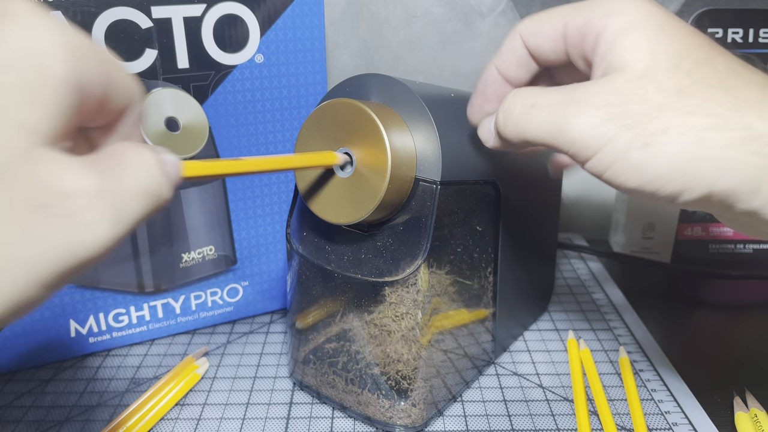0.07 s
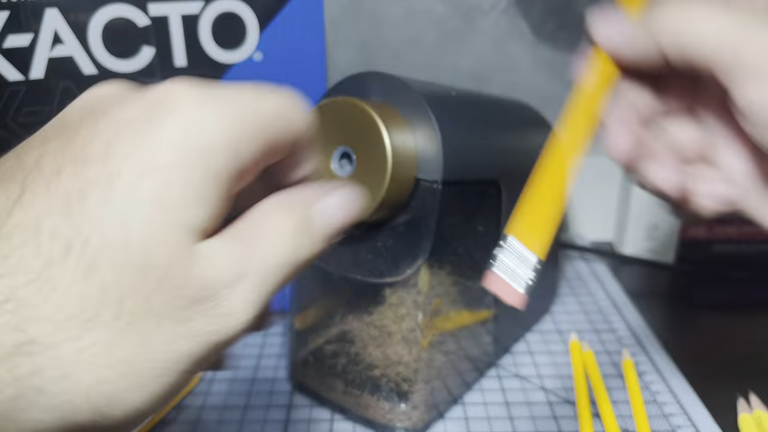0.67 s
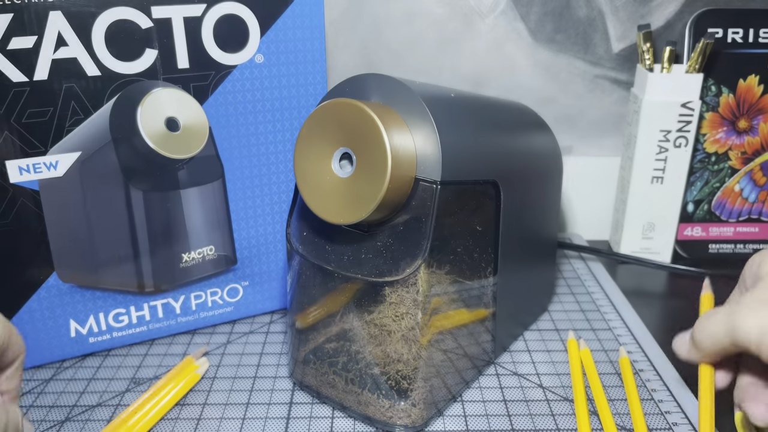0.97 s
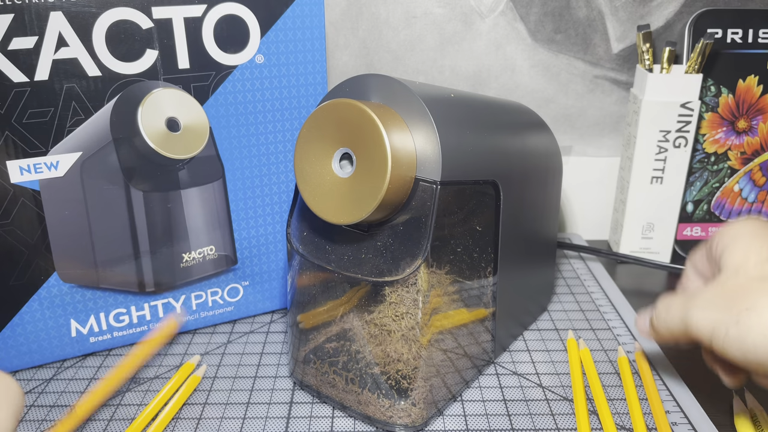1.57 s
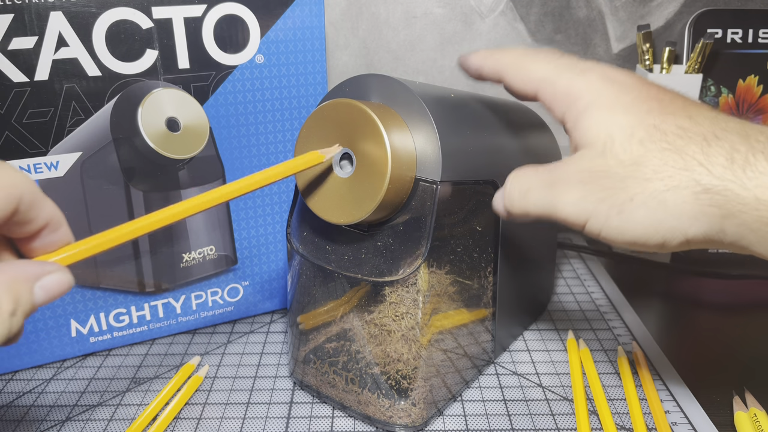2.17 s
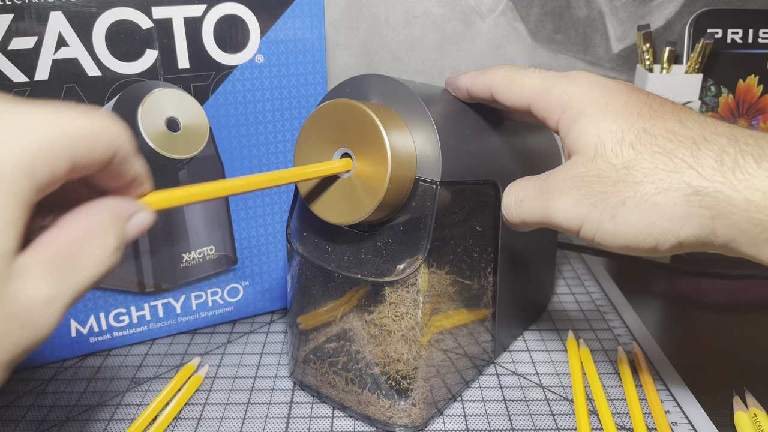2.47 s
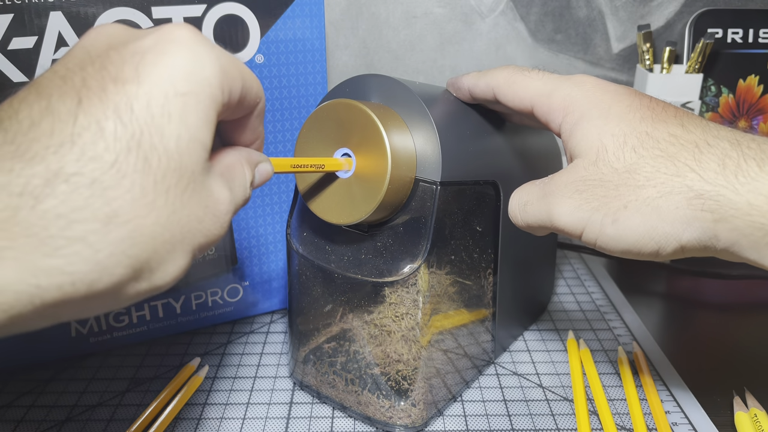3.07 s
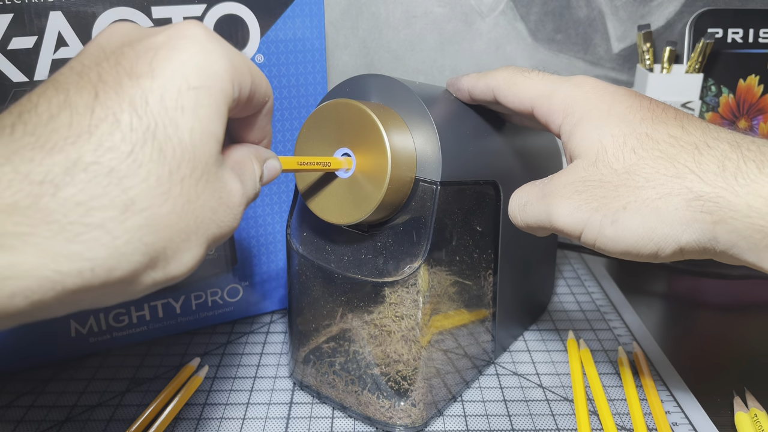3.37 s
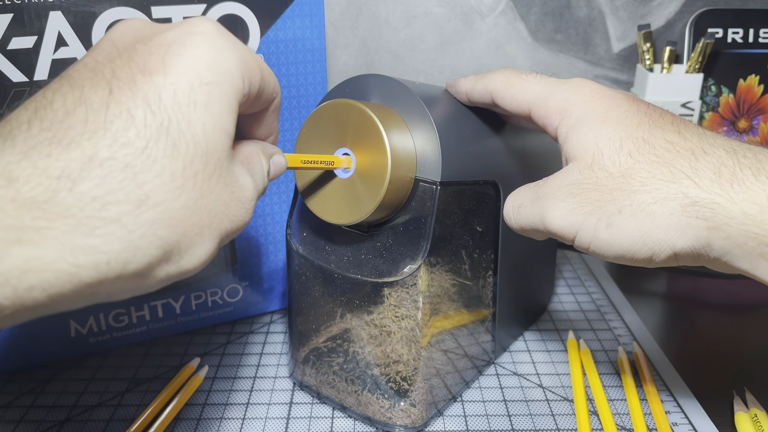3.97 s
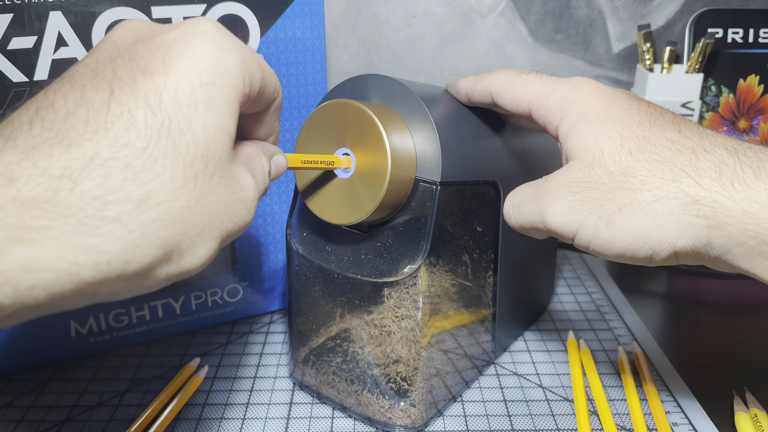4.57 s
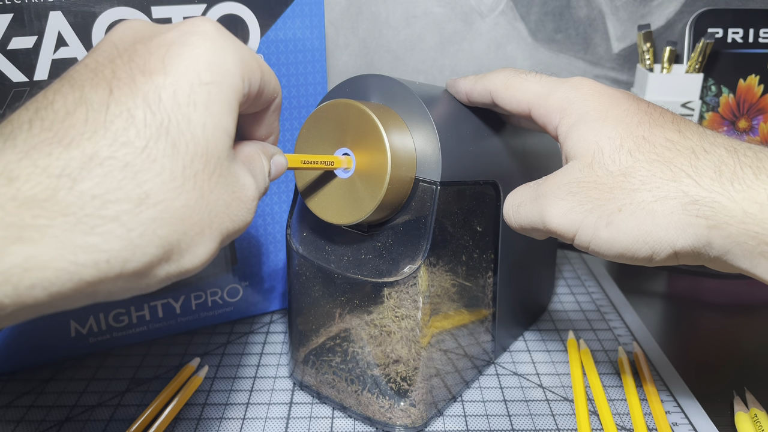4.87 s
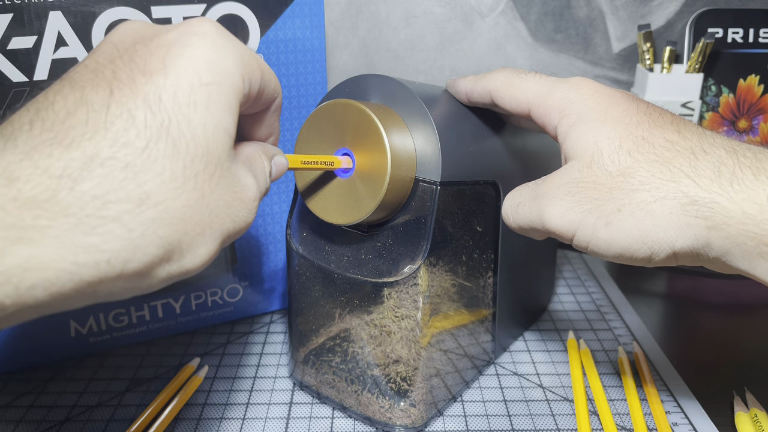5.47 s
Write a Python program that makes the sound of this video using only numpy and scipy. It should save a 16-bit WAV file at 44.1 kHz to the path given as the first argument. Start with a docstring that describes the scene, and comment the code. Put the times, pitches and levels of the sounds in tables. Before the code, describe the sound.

Pencils clatter lightly on a desk, then an electric sharpener grinds loudly through wood, eases to a lighter ticking whir and winds down.

```python
"""Electric pencil sharpener on a desk

Close up, small room. A pencil is drawn out and dropped among others; the next is fed in and starts
the motor. Hand push sets how hard the gears rattle in the plastic case and how deep the cutter rasps.
As it eases, the cutter runs lightly, catching the point once a turn, then switches off and coasts
to rest. A last scrape and two taps on the rim of the hole follow."""
import sys
import numpy as np
from scipy import signal
from scipy.fft import rfft, irfft, next_fast_len
from scipy.io import wavfile
from scipy.ndimage import uniform_filter1d

SR = 44100
rng = np.random.default_rng(int(sys.argv[2]) if len(sys.argv) > 2 else 0)


def store_pcm(level_fs):
    """Save levels as 16-bit WAV."""
    pcm = np.round(np.clip(level_fs, -1, 1) * 32767).astype(np.int16)
    wavfile.write(sys.argv[1], SR, np.atleast_2d(pcm).T)


N = 252252
TIME_S = np.arange(N) / SR
ON_S, OFF_S, FREE_TURNS_PER_S = 2.596, 4.926, 6.87

# Plastic case, cutter loose. Each row: frequency in Hz, width in Hz, lift in dB.
CASE_MODES = [(457, 130, 7.5), (766.3, 58, 13.5), (858, 120, 9), (1154, 90, 3.5), (1512, 210, 4.5),
              (1893, 70, 6.5), (2158, 65, 12), (2415, 46, 5.5), (3504, 270, 5), (3700, 220, 1.5),
              (4510, 170, 11)]
# Gear noise. Each row: frequency in Hz, density in dB.
GEAR_SPECTRUM = [(30, -37), (70, -16), (170, -21), (270, -9), (600, -5), (1000, -5), (1350, -10),
                 (2200, -12), (2650, -20.5), (4500, -27), (6500, -28.5), (9000, -45), (13000, -44)]
# Chips ticking in the bin. Each row: frequency in Hz, density in dB.
CHIP_SPECTRUM = [(200, -33.5), (1500, -6.5), (3300, 4.5), (4600, -4.5), (6200, -5.5), (8400, 0.5),
                 (10300, 0.5), (11600, -5), (12900, -18.5), (13500, -22.5), (16000, -37.5)]


def sharpener(sag=.23, wedging=.82, throb_db=1.0):
    """Gear rattle plus cutter rasp; both grow with load and fade as the motor slows."""
    push, depth, spin = drive()
    turns_per_s = FREE_TURNS_PER_S * spin * (1 - sag * push ** 2)
    angle = 2 * np.pi * np.cumsum(turns_per_s) / SR
    bite = np.clip(wedging * depth, 0, 1)
    pace = np.clip(spin / .8, 0, 1)
    # Load swings 3 times a turn in wood, 4 when loose.
    throb = amp(throb_db * (bite * np.sin(3 * angle) + (.5 - bite) * np.sin(4 * angle)))
    knocks = tooth_knocks(angle) * throb
    rattle = gears(knocks, bite, pace)
    cutting = cutter(knocks, bite, pace, throb, turns_per_s)
    spin_decades = np.log10(spin + 1e-9)
    rattle_db = -28 + 12 * push + 32.5 * spin_decades
    cutting_db = -45 + 19 * depth + 47 * spin_decades
    return amp(rattle_db) * rattle + amp(cutting_db) * cutting


def drive(seated_s=2.88, seating_s=.26, full_depth_push=.76, spin_up_s=.03, coast_s=.55):
    """Hand push, blade depth and motor spin, each 0-1; depth grows as the tip seats."""
    # Each row: time in seconds, push 0-1.
    hand_push = [(2.6, 0.56), (2.83, .86), (3.3, 0.98), (3.5, 0.67), (3.575, 0.7), (3.635, 0.05),
                 (3.9, 0.02), (4.45, .2), (4.62, .14), (4.89, .33), (4.95, 0)]
    push = np.clip(np.interp(TIME_S, *np.transpose(hand_push)), 0, 1)
    seated = np.clip(1 + (TIME_S - seated_s) / seating_s, 0, 1)
    spin_up = 1 - np.exp(-np.maximum(TIME_S - ON_S, 0) / spin_up_s)
    coast = 1 - np.clip((TIME_S - OFF_S) / coast_s, 0, 1) ** 1.25
    return push, seated * np.minimum(push / full_depth_push, 1), spin_up * coast


def tooth_knocks(angle, teeth=58):
    """One impulse per gear tooth, uneven in time and strength."""
    tooth = np.maximum.accumulate(np.floor(teeth * angle / (2 * np.pi) + .25 * wander(400)))
    return (np.diff(tooth, prepend=tooth[0]) > 0) * strengths(spread_db=5)


def gears(knocks, bite, pace):
    """Teeth ring the case: clattering when fast, smooth and dull when slow."""
    # Case, pencil wedged against the cutter. Each row: frequency in Hz, width in Hz, lift in dB.
    wedged_modes = [(266, 180, 3.5), (407.5, 45, 10.5), (744, 50, 8.5), (812, 99, 13.5), (968, 38, 7.5),
                    (1164, 60, 11.5), (1395, 70, 9.5), (1690, 53, 4.5), (1856, 43, 11), (2190, 70, 11.5),
                    (2450, 60, 5.5), (3380, 370, 11.5), (4170, 440, 4.5)]
    mesh = noise() * (pace * bursts(knocks, decay_s=.00098) + 2.3 - pace)
    mesh = pace * mesh + (1 - pace) * 2.4 * lowpass(mesh, 800, order=1)
    loose = unit_running(colour(mesh, GEAR_SPECTRUM, CASE_MODES))
    wedged = unit_running(colour(mesh, GEAR_SPECTRUM, wedged_modes))
    return amp(1) * (1 - bite) * loose + amp(.5) * bite * wedged


def cutter(knocks, bite, pace, throb, turns_per_s, chips_per_turn=16):
    """Blades rasp steadily in a deep bite; a light one gives chip ticks and splinter snaps."""
    # Each row: frequency in Hz, density in dB.
    rasp_spectrum = [(200, -28.5), (1500, 5), (3000, -15.5), (4500, 2), (6200, -8), (8300, 5), (10300, 6.5),
                     (11600, 1.5), (12900, -1.5), (13500, -8.5), (14500, -13), (16000, -19)]
    rasp = unit_running(colour(noise() * np.sqrt(throb) * amp(2 * wander(130)), rasp_spectrum))
    chips = (rng.random(N) < chips_per_turn * turns_per_s / SR) * strengths(spread_db=6) * throb
    ticking = pace * bursts(chips + .5 * knocks, decay_s=.0018) + 1.4 - pace
    ticks = unit_running(colour(noise() * ticking, CHIP_SPECTRUM, CASE_MODES[-3:]))
    snaps = unit_running(splinters(rate_per_s=60 * turns_per_s * pace * throb))
    return amp(2.5) * bite * rasp + amp(3.5) * (1 - bite) * ticks + (1 - .94 * bite) * snaps


def splinters(rate_per_s, pitches=24, size=300):
    """Splinters snap, each a cycle or two at its own pitch."""
    snaps = (rng.random(N) < rate_per_s / SR) * strengths(spread_db=10)
    pitch_index = rng.integers(0, pitches, N)
    out, t = np.zeros((2, N)), np.arange(size) / SR
    for k, hz in enumerate(np.geomspace(2600, 4700, pitches)):
        cycles = hz * t
        snap = np.sin(2 * np.pi * cycles + rng.normal(0, .97, (2, 1))) * cycles * np.exp(-cycles)
        out += signal.oaconvolve((snaps * (pitch_index == k))[None], snap, axes=1)[:, :N]
    return unit(out)


def snags(jolt_trim_db=-1.5, size=4096):
    """A caught splinter jolts the gears and tears off with a crunch."""
    # Each row: start in seconds, relative jolt in dB, crunch in dB, tearing time in seconds.
    hard_snags = [(2.608, -15, -35.5, 0.0032), (2.657, -11.5, -27, 0.0071), (2.691, -7.5, -36, 0.0053),
                  (2.703, -13, -21.5, 0.0068), (2.768, -12.5, -25, 0.023), (2.823, -4, -17.5, .0055),
                  (3.962, -10, -35, 0.0049), (4.105, -23, -45, .004), (4.278, -12, -28.5, .005),
                  (4.538, -11, -55, 0.0058), (4.69, -20, -33.5, .004), (4.823, -11.5, -26.5, 0.0054),
                  (5.08, -13.5, -57, .004), (5.219, -19, -36.5, .005)]
    out, t = np.zeros((2, N)), np.arange(size) / SR
    for start_s, jolt_db, crunch_db, tear_s in hard_snags + light_snags():
        tear = (1 - np.exp(-t / .0006)) * np.exp(-(t / (2 * tear_s)) ** 2)
        jolt = colour(noise(size) * tear, GEAR_SPECTRUM, CASE_MODES)
        jolt *= amp(jolt_db + jolt_trim_db) / abs(jolt).max()
        crunch = colour(noise(size) * tear, CHIP_SPECTRUM, CASE_MODES[-3:])
        crunch *= amp(crunch_db) / crunch[:, :size // 10].std()
        add(out, start_s + .001, jolt + crunch)
    return out


def light_snags(first_s=3.714, chance_per_s=11, spread_db=1.0, count=40):
    """Snag rows under light push: one catch a turn, plus small ones by chance."""
    # Each: relative jolt in dB, crunch in dB, tearing time in seconds.
    turn_catch = (-21, -31.5, 0.0041)
    small_snag = (-30, -38.5, 0.0037)
    chance_s = first_s + np.cumsum(rng.uniform(.3, 1.7, count)) / chance_per_s
    rows = [(first_s + k / FREE_TURNS_PER_S, *turn_catch) for k in range(count)]
    rows += [(s, *small_snag) for s in chance_s]
    offsets_db = spread_db * rng.standard_normal(len(rows))
    return [(s, jolt_db + db, crunch_db + db, tear_s)
            for (s, jolt_db, crunch_db, tear_s), db in zip(rows, offsets_db) if s < OFF_S]


def pencil_drop():
    """A pencil bounces among the others and rocks to rest."""
    # Each row: start in seconds, relative body and click levels in dB.
    clacks = [(1.256, -23.5, -39), (1.267, -23, -14.5), (1.294, -24, -35.5), (1.319, -21, -29.5),
              (1.332, -30, -29), (1.345, -29, -19.5), (1.493, -30.5, -39), (1.516, -37, -56),
              (1.53, -36, -34.5), (1.706, -41.5, -77)]
    # Each row: frequency in Hz, width in Hz, lift in dB.
    pencil_modes = [(270, 110, 4.5), (420, 100, 4), (710, 83, 3), (1635, 230, 4.5), (1870, 280, 14),
                    (3000, 240, 3), (4575, 300, 12.5)]
    return blows(clacks + rocking(), pencil_modes, body_gain_db=12.5, click_gain_db=18.5,
                 click_s=.0026, chatter_s=.012, soft_hz=11000, detune=.029)


def rocking(gap_s=.028, loss_db=5):
    """Blow rows of a pencil settling on its flats: evenly spaced, each weaker."""
    # Each row: start and end in seconds, first knock's relative body and click levels in dB.
    spells = [(1.356, 1.46, -25, -60.5), (1.565, 1.61, -27, -52)]
    return [(s, body_db - k * loss_db, click_db - k * loss_db)
            for start_s, end_s, body_db, click_db in spells
            for k, s in enumerate(np.arange(start_s, end_s, gap_s))]


def desk_bumps():
    """A pencil end meets the desk mat."""
    # Each row: start in seconds, relative body and click levels in dB.
    bumps = [(1.067, -45, -66), (1.089, -44.5, -83.5), (1.178, -27, -39), (1.186, -28.5, -51),
             (1.196, -31, -52)]
    # Each row: frequency in Hz, width in Hz, lift in dB.
    desk_modes = [(270, 80, 5), (500, 58, 9.5), (861, 63, 12), (1040, 90, 9.3), (1230, 50, 18),
                  (1424, 70, 6), (2030, 90, 5)]
    return blows(bumps, desk_modes, body_gain_db=16.5, click_gain_db=19,
                 click_s=.0022, chatter_s=.0061, soft_hz=7000, detune=.02)


def rim_taps():
    """The pencil touches the rim of the guide hole."""
    # Each row: start in seconds, relative body and click levels in dB.
    taps = [(0.003, -47, -37), (0.04, -54, -41), (0.062, -28.5, -36), (0.101, -37, -43.5),
            (2.249, -26.5, -45), (2.26, -25, -49), (2.402, -30, -56), (2.452, -40.5, -44.5),
            (2.51, -41, -46.5), (2.585, -25, -36), (5.6, -36, -62.5), (5.711, -32, -28)]
    # Each row: frequency in Hz, width in Hz, lift in dB.
    rim_modes = [(470, 70, 13), (555, 87, 17.5), (770, 120, 7), (1217, 80, 4), (1900, 120, 4),
                 (2270, 110, 11)]
    return blows(taps, rim_modes, body_gain_db=13.5, click_gain_db=21.5,
                 click_s=.0018, chatter_s=.007, soft_hz=7500, detune=.02)


def blows(rows, modes, body_gain_db, click_gain_db, click_s, chatter_s, soft_hz, detune, size=8192):
    """Each blow rings the struck body and clicks at the contact."""
    # Each row: frequency in Hz, density in dB.
    wood_spectrum = [(30, -23.5), (100, -10), (250, -2), (500, -1), (1000, 0.5), (2100, -7), (3000, -10.5),
                     (5000, -16), (12000, -38.5)]
    click_spectrum = [(300, -33), (1800, 5), (3000, -5.5), (4500, -1), (6500, -6), (8300, -3), (11000, 4),
                      (12200, -18.5), (13300, -27.5), (16000, -40)]
    out, t = np.zeros((2, N)), np.arange(size) / SR
    click_envelope = (1 - np.exp(-t / .0003)) * (np.exp(-t / click_s) + .07 * np.exp(-t / .017))
    for start_s, body_db, click_db in rows:
        chatter = noise(size) * (1 - np.exp(-t / .00093)) * np.exp(-t / chatter_s)
        contact = .25 * (t == 0) + chatter / np.linalg.norm(chatter[0])
        # Modes shift with the contact point and the way the pencil lies.
        ratios = 1 + detune * (2 * rng.random(len(modes)) - 1)
        shifted = [(hz * ratio, width_hz, db) for (hz, width_hz, db), ratio in zip(modes, ratios)]
        # Little click means a soft blow: high modes stay still.
        top_hz = np.clip(soft_hz * amp((click_db - body_db) / 2), 600, 12000)
        body = lowpass(colour(contact, wood_spectrum, shifted), top_hz, order=2)
        body *= amp(body_db + body_gain_db) / np.linalg.norm(body[0])
        click = colour(noise(size) * click_envelope, click_spectrum)
        click *= amp(click_db + click_gain_db) / np.linalg.norm(click[0])
        add(out, start_s + .0014, body + click)
    return out


def sliding():
    """Wood scrapes in the guide hole and rings it; fingers slip once over the lacquer."""
    # Each row: start and length in seconds, first and last level in dB.
    slides = [(-.01, .09, -41, -42.5), (2.274, .182, -60, -46), (2.502, .1, -50, -46.5),
              (5.673, .05, -57.5, -37)]
    finger_slip = (.35, .09, -64.5, -69)
    # Each row: frequency in Hz, density in dB.
    rub_spectrum = [(40, -29.5), (200, -18.5), (380, -3), (560, -5), (800, -4.5), (2200, -11.5),
                    (2900, -17.5), (4000, -16.5), (6500, -29), (8700, -12.5), (11000, -22.5), (12300, -46),
                    (14000, -52.5)]
    skin_spectrum = [(500, -36), (5000, -22), (6500, -8), (7400, 2), (9300, 2), (11500, -7), (13000, -32)]
    # Each row: frequency in Hz, width in Hz, lift in dB.
    hole_modes = [(523, 100, 8.5), (2200, 200, 3.5), (3850, 300, 4.5)]
    scrape = unit(colour(noise() * amp(2.5 * wander(200)), rub_spectrum, hole_modes))
    hiss = unit(colour(noise(), skin_spectrum))
    return sum(stroke(*row) for row in slides) * scrape + stroke(*finger_slip) * hiss


def stroke(start_s, length_s, first_db, last_db, attack_s=.008, release_s=.013):
    """Slide envelope: attack, even swell or fade, release."""
    t = TIME_S - start_s
    gate = np.clip(t / attack_s, 0, 1) * np.exp(-np.maximum(t - length_s, 0) / release_s)
    return gate * amp(first_db + (last_db - first_db) * np.clip(t / length_s, 0, 1))


def motor_hum(mains_hz=60, rise_s=.08, fade_s=.0426):
    """The iron pulls twice per mains cycle, harder and less evenly under load."""
    # Each row: multiple of the mains, relative level in dB.
    orders = [(1, -15), (2, 0), (4, -16.5)]
    push = drive()[0]
    tone = unit(sum(amp(db) * np.sin(2 * np.pi * (k * mains_hz * TIME_S + rng.random()))
                    for k, db in orders))
    rise = np.clip((TIME_S - ON_S) / rise_s, 0, 1) ** 2
    fade = np.exp(-np.maximum(TIME_S - OFF_S, 0) / fade_s)
    level_db = -42 + 1.5 * push + 1.5 * (.5 + push) * wander(1500)
    return amp(level_db) * rise * fade * tone


def room_echoes(x, size=20000):
    """Sparse wall echoes, each band at its own decay rate; soft clutter dulls the treble."""
    # Each row: frequency in Hz, 60 dB decay time in seconds.
    decay_times = [(150, .34), (660, .26), (1800, .27), (4600, .22), (12000, .15)]
    taps = rng.standard_normal((2, size)) * (rng.random((2, size)) < .1) * (np.arange(size) > .004 * SR)
    hz, t, bands = signal.stft(taps, SR, nperseg=256)
    tilt_db = lookup([(200, 6.0), (2000, -2.0), (7000, -1.5), (10500, -6.5)], hz)[:, None]
    decay_db = 60 * t / lookup(decay_times, hz)[:, None]
    tail = signal.istft(bands * amp(tilt_db - decay_db), SR, nperseg=256)[1]
    return signal.fftconvolve(x, tail / np.linalg.norm(tail[0]), axes=1)[:, :N]


def room_noise(level_db=-66.5):
    """Faint steady rumble and hiss."""
    # Each row: frequency in Hz, density in dB.
    spectrum = [(12, -35), (20, -16), (32, -14), (54, -2.5), (108, -15.5), (229, -21.5), (367, -28.5),
                (421, -30.5), (540, -34.5), (1140, -40.5), (1240, -42), (6360, -51), (15000, -59)]
    return amp(level_db) * unit(colour(noise(), spectrum))


def noise(size=N):
    """White noise, partly coherent at the two microphone ports."""
    # Each row: frequency in Hz, coherence 0-1.
    port_coherence = [(100, 1), (500, .94), (850, 0.85), (1250, 0.45), (2000, 0.78), (4000, .7),
                      (7000, 0.71), (8500, .92), (10300, 1), (13000, 0.97)]
    a, b = rfft(rng.standard_normal((2, size)))
    coherence = np.clip(lookup(port_coherence, np.fft.rfftfreq(size, 1 / SR)), 0, 1)
    mid, side = np.sqrt((1 + coherence) / 2) * a, np.sqrt((1 - coherence) / 2) * b
    return irfft(np.array([mid + side, mid - side]), size)


def colour(x, spectrum, modes=(), size=4096):
    """Minimum-phase filter: broad spectrum plus ringing modes."""
    hz = np.fft.rfftfreq(size, 1 / SR)
    lift = 1 + sum((amp(db) ** 2 - 1) / (1 + (2 * (hz - mode_hz) / width_hz) ** 2) ** 2
                   for mode_hz, width_hz, db in modes)
    cepstrum = irfft(np.log(amp(lookup(spectrum, hz)) * np.sqrt(np.abs(lift))))
    cepstrum[1:size // 2] *= 2
    cepstrum[size // 2 + 1:] = 0
    response = irfft(np.exp(rfft(cepstrum)))
    return signal.oaconvolve(x, response[None], axes=1)[:, :x.shape[1]]


def lowpass(x, hz, order):
    """Maximally flat low-pass."""
    return signal.sosfilt(signal.butter(order, hz, fs=SR, output="sos"), x)


def bursts(impacts, decay_s):
    """Envelope of one dying burst per impact, levelled over the long run."""
    power = signal.lfilter([1], [1, -np.exp(-1 / (decay_s * SR))], impacts ** 2)
    return np.sqrt(power / (np.abs(uniform_filter1d(power, size=5000)) + 1e-9))


def strengths(spread_db):
    """Random impact gains."""
    return amp(spread_db * np.clip(rng.standard_normal(N), -2, 2))


def wander(samples):
    """Smooth random drift, rms 1."""
    return unit(uniform_filter1d(uniform_filter1d(rng.standard_normal(N), samples), samples))


def amp(db):
    """Decibels to gain."""
    return 10 ** (np.asarray(db) / 20)


def unit(x):
    """Scale to rms 1."""
    return x / np.sqrt(np.mean(x ** 2) + 1e-20)


def unit_running(x):
    """Scale to rms 1 over the motor's on time."""
    return x / np.sqrt(np.mean(x[:, (TIME_S > ON_S) & (TIME_S < OFF_S)] ** 2) + 1e-20)


def lookup(table, hz):
    """Interpolate on a log-frequency axis."""
    table_hz, values = np.transpose(table)
    return np.interp(np.log(hz + 1), np.log(table_hz + 1), values)


def add(mix, start_s, sound):
    """Mix in a stereo sound."""
    part = mix[:, max(round(start_s * SR), 0):][:, :sound.shape[1]]
    part += sound[:, :part.shape[1]]


def scene():
    """Sharpener, handled pencils, quiet room."""
    machine = sharpener() + snags()
    handling = sliding() + pencil_drop() + desk_bumps() + rim_taps()
    echoes = room_echoes(amp(-19.5) * machine + amp(-12) * handling)
    return machine + handling + echoes + motor_hum() + room_noise()


def record(dry, ceiling=.85, edge_hz=15900):
    """Phase and level offsets between the two ports, soft clip, band limit."""
    # Each row: frequency in Hz, left lead in radians.
    port_phase = [(100, 0), (2000, 0), (3100, 1.2), (4700, .6), (6300, .3), (7700, 1), (8800, -.1),
                  (9200, -1.4), (10250, -3.14), (11800, -6.2), (12500, -6.4), (13300, -9.3)]
    # Each row: frequency in Hz, left minus right in dB.
    port_balance = [(60, 1.5), (120, -5), (240, -1), (480, 0), (950, 0.5), (1890, 1.5), (3770, 2),
                    (7520, 2), (15000, -2)]
    size = next_fast_len(N + SR)
    hz = np.fft.rfftfreq(size, 1 / SR)
    left = amp(lookup(port_balance, hz) / 2) * np.exp(.5j * lookup(port_phase, hz))
    heard = irfft(rfft(dry, size) * np.array([left, 1 / left]), size)[:, :N]
    clipped = heard / (1 + (heard / ceiling) ** 4) ** .25
    band_limit = signal.firwin(511, edge_hz, window=("kaiser", 9), fs=SR)
    return signal.oaconvolve(clipped, band_limit[None], "same")


dry = scene()
out = record(dry)
store_pcm(out)
```